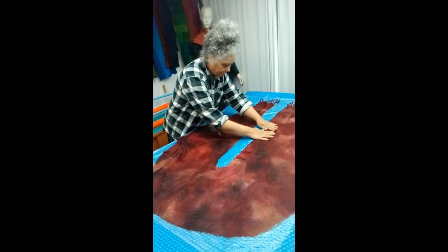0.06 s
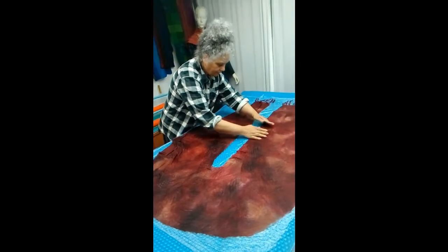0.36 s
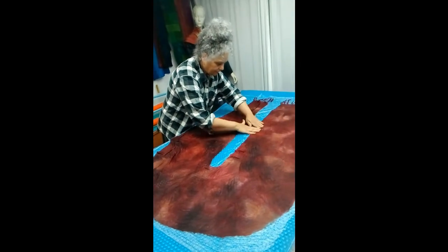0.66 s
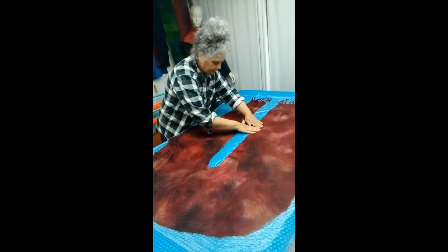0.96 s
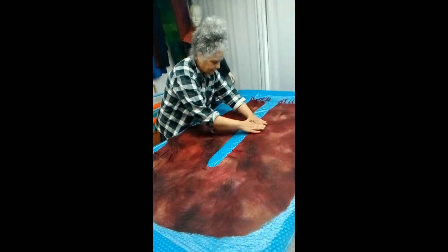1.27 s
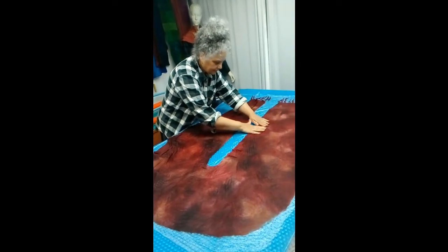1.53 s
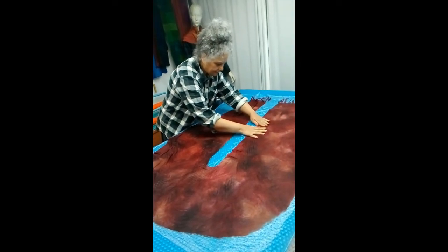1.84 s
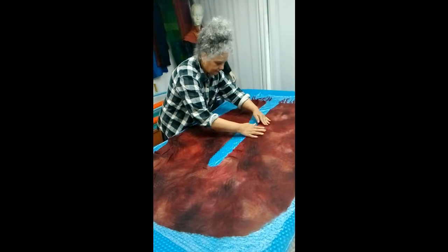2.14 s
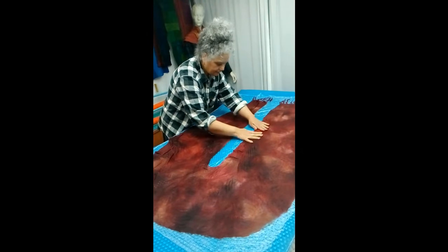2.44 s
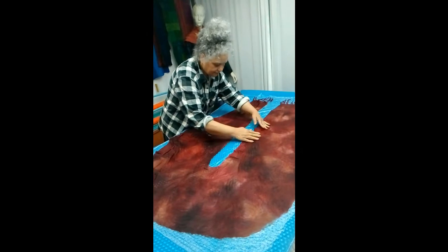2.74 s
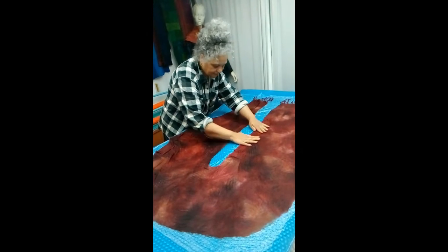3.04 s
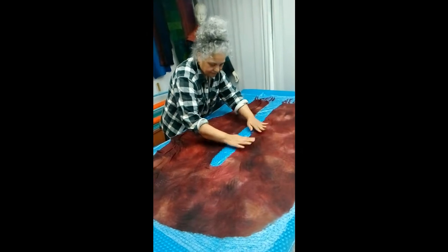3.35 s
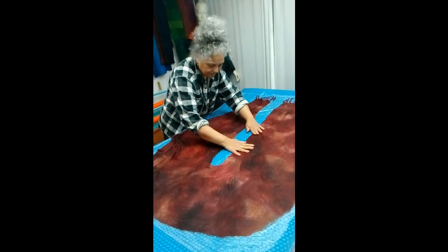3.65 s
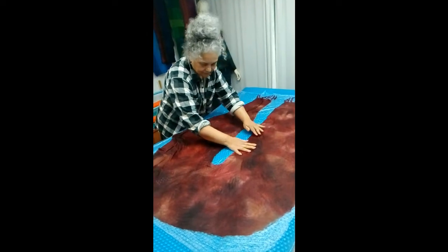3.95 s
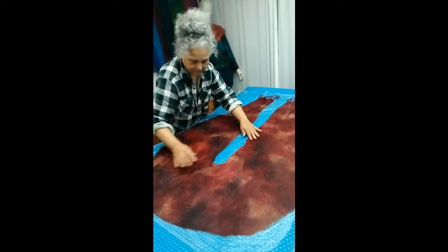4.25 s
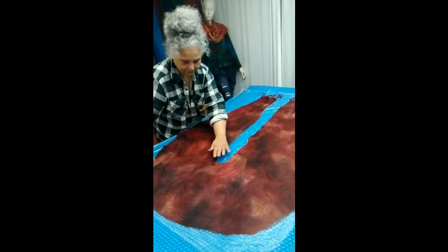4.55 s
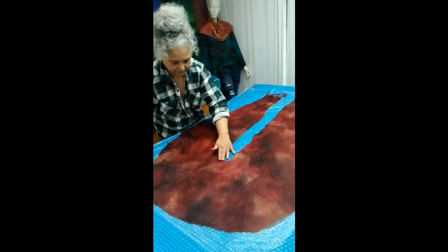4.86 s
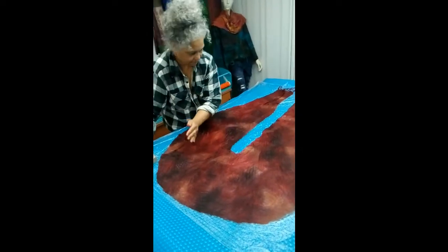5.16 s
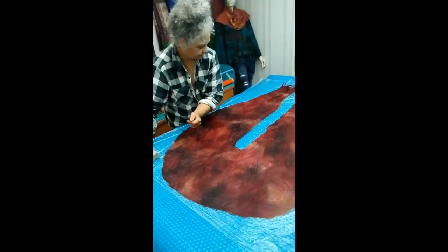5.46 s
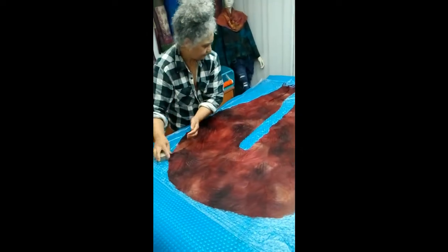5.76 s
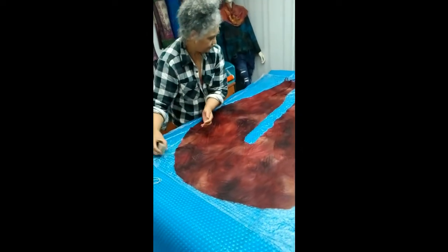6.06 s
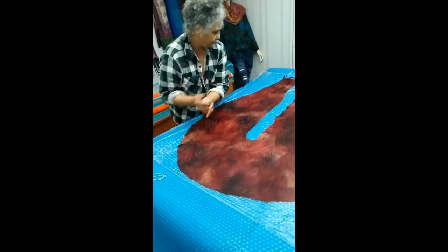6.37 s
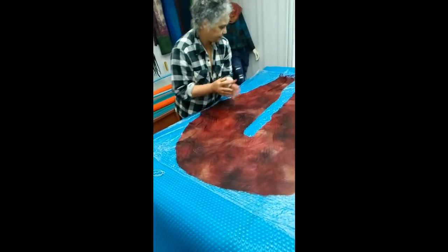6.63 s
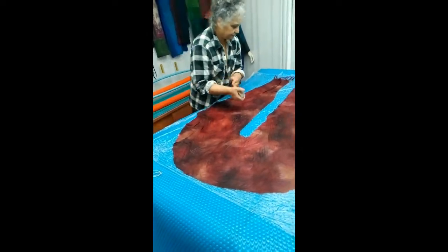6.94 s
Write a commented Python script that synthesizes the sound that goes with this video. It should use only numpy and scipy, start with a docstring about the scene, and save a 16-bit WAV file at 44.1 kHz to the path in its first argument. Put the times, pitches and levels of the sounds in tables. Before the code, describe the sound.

Hands rub wet felt on bubble wrap in soft strokes, then two heavy table thumps and a few small wet pops, over a low hum.

```python
"""Hands rub wet felt laid on bubble wrap, close to the microphone, at a work table in a small room.
The fibres catch and slip with each stroke, and the palms pat the felt softly. Later two heavy thumps
shake the table and crinkle the plastic; a few small wet pops follow as the hands come together.
After a brief low bump at the start, a motor hums some way off, under the steady air of the room."""
import sys
import numpy as np
from scipy import signal
from scipy.fft import rfft, irfft
from scipy.io import wavfile
from scipy.ndimage import uniform_filter1d

SR = 44100
rng = np.random.default_rng(int(sys.argv[2]) if len(sys.argv) > 2 else 0)


def persist_wave(psi):
    """Save psi, clipped to +-1, as 16-bit WAV."""
    counts = np.round(np.clip(psi, -1, 1) * 32767).astype(np.int16)
    wavfile.write(sys.argv[1], SR, np.atleast_2d(counts).T)


N = 308700

# heavy thumps: (time [s], level [dB], gap between rebounds [s], delay of the slap on the plastic [s],
# slap level [dB], spectral hump of the settling plastic [Hz], its fall time constant [s])
HEAVY_THUMPS = [(5.155, -7, .0675, .001, -33.5, 1500, .042), (5.581, -7.5, .045, .0165, -22.5, 2100, .055)]


def rubbing():
    """Wet fibres catch and slip under the palms, with a dull swish and a fizz of water and plastic."""
    # spectra of the fibres and the swish: (frequency [Hz], level [dB])
    felt_spectrum = [(50, -33), (160, 14), (300, 3.5), (600, -2.5), (1000, -2.5), (1400, -2.5), (2050, 4),
                     (2600, -4), (3500, -1), (6000, -27), (9000, -23), (16000, -51)]
    swish_spectrum = [(60, -14), (170, 5), (330, 5), (580, -7.5), (800, 1.5), (1050, 2.5), (1400, -2.5),
                      (2500, -33), (8000, -42), (16000, -50)]
    # spectrum of the fizz, plus a thin, very high hiss near 15 kHz: (frequency [Hz], level [dB])
    fizz_and_hiss = [(500, -24), (2000, -1.5), (3500, -3), (5000, 0), (6600, 0), (7300, -7), (8200, -16),
                     (10500, -18.5), (14000, -22), (14900, -7), (16000, -37)]
    # weight on the palms: (time [s], swish level [dB])
    palm_weight = [(0, -55), (.8, -59), (1.3, -54.5), (2.3, -57), (2.7, -50.5), (3.3, -47.5), (4.4, -56),
                   (4.8, -52.5), (6.4, -73), (7, -66)]
    friction_gain, fizz_gain = strokes()
    swish_db, = curves(palm_weight)
    grip = drift(rate_hz=9.2)  # the palms drag unevenly
    felt = colour(slips(N, per_s=5000, spread_db=3), felt_spectrum)
    felt = shifting(felt, depth_db=2.5, width_hz=220, hold_s=.066)
    fizz = colour(slips(N, per_s=7000, spread_db=-1), fizz_and_hiss)
    fizz = shifting(fizz, depth_db=2, width_hz=300, hold_s=.07)
    swish = colour(rng.standard_normal(N), swish_spectrum)
    swish = shifting(swish, depth_db=2.5, width_hz=130, hold_s=.083)
    beads = near_echoes(colour(slips(N, per_s=70, spread_db=7.5), fizz_and_hiss))  # water beads break
    return (felt * friction_gain * amp(.3 + 1.6 * grip)
            + swish * amp(swish_db + .8 * grip)
            + fizz_gain * (fizz * amp(.4 + .85 * grip) + amp(-10) * beads))


def strokes():
    """Friction and fizz gains: a palm gathers speed, slows a little, then glides to rest."""
    # (start [s], length [s], friction level [dB], fizz level [dB])
    palm_strokes = [(0, .16, -50, -53.5), (.18, .057, -42.5, -45.5), (.285, .2, -49.5, -53),
                    (.595, .255, -46, -46.5), (.87, .2, -44.5, -47), (1.115, .098, -44, -46),
                    (1.35, .12, -45.5, -48.5), (1.51, .25, -48.5, -52.5), (1.82, .057, -46, -47.5),
                    (1.92, .063, -46, -49.5), (2.04, .2, -48, -53), (2.375, .17, -47, -47),
                    (2.68, .17, -47, -50), (2.91, .044, -43, -46.5), (2.985, .095, -44.5, -45.5),
                    (3.115, .27, -45.5, -48), (3.45, .3, -45, -46.5), (3.81, .24, -44.5, -47),
                    (4.075, .31, -46.5, -45.5), (4.63, .2, -43.5, -43.5), (4.82, .2, -48, -45.5),
                    (5.07, .08, -49, -47), (5.265, .125, -44.5, -42), (5.43, .13, -47.5, -43),
                    (5.655, .055, -44, -41), (5.74, .05, -55, -49), (5.825, .22, -46.5, -40.5),
                    (6.105, .085, -45.5, -38.5), (6.54, .05, -53, -56), (6.945, .096, -47, -52)]
    rise_s, sag_db, fall_s = .04, -1.2, .048
    friction_power, fizz_power, t = np.zeros(N), np.zeros(N), np.arange(SR) / SR
    for s, length_s, friction_db, fizz_db in palm_strokes:
        rise = 1 - np.exp(-(t / rise_s) ** 2)
        fall = np.exp(-np.maximum(t - length_s, 0) / fall_s)
        shape = rise * amp(sag_db * np.minimum(t / length_s, 1)) * fall
        add(friction_power, s, (amp(friction_db) * shape) ** 2)
        add(fizz_power, s, (amp(fizz_db) * shape) ** 2)
    return np.sqrt(friction_power), np.sqrt(fizz_power)


def shifting(x, depth_db, width_hz, hold_s):
    """Hands and folds keep changing shape, so patches of the spectrum bloom and fade."""
    hz, when, z = signal.stft(x, SR, nperseg=1024, noverlap=768)
    patches = uniform_filter1d(rng.standard_normal(z.shape), max(1, round(width_hz / hz[1])), axis=0)
    patches = unit(uniform_filter1d(patches, max(1, round(hold_s / when[1])), axis=1))
    return unit(signal.istft(z * amp(depth_db * patches), SR, nperseg=1024, noverlap=768)[1][:N])


def blows():
    """Soft pats land once; each heavy thump rebounds three times, ever weaker, the first a little higher than
    the blow and the next two sinking lower."""
    # a palm on the felt: (time [s], level [dB], pitch [Hz], swell [s])
    pats = [(.589, -25, 163, .006), (.622, -32, 154, .017), (1.402, -26.5, 160, .008),
            (1.86, -32, 160, .013), (2.48, -34.5, 198, .012), (2.79, -33, 205, .013),
            (2.924, -33, 190, .013), (3.515, -25.5, 155, .016), (4.686, -30, 160, .008),
            (4.986, -26, 195, .005), (6.8, -36.5, 168, .009)]
    rebound_db_per_s, pitch_ratio = -172, .54
    out = np.zeros(N)
    for s, db, hz, swell_s in pats:
        add(out, s, amp(db) * thud(hz, swell_s, ring_db=-11))
    for s, db, gap_s, *_ in HEAVY_THUMPS:
        add(out, s, amp(db) * thud(hz=212, swell_s=.005, ring_db=-8.5))
        for k in (1, 2, 3):
            rebound = thud(hz=235 * pitch_ratio ** (k - 1), swell_s=.0065, ring_db=-7)
            add(out, s + k * gap_s, amp(db + rebound_db_per_s * k * gap_s) * rebound)
    return out


def thud(hz, swell_s, ring_db):
    """A padded thud and a brief knock, then the table rings; duller blows barely reach its top modes."""
    # modes of the work table: (frequency [Hz], level [dB], time to fall 60 dB [s])
    table_modes = [(76.7, -9, 0.37), (103.8, -8, 0.28), (143, -5, 0.28), (177.4, 2, 0.22), (239, -3, 0.2),
                   (265.5, -9, 0.25), (319, -11.5, 0.4), (364.2, -1.5, 0.2), (396, -9, 0.33),
                   (449, -8.5, 0.27), (512, -7, .25), (716.6, -6, 0.16)]
    t = np.arange(SR // 2) / SR
    spread = 1 - np.exp(-(t / .014) ** 2)  # the blow takes a moment to travel through the top
    ring = sum(amp(db - 60 * t / t60) * np.sin(2 * np.pi * f * t) / np.hypot(1, (f / (1.8 * hz)) ** 2)
               for f, db, t60 in table_modes)
    knock = amp(-12) * wavelet(t, 1.83 * hz, .55 * swell_s)
    return wavelet(t, hz, swell_s) + knock + amp(ring_db) * spread * ring


def bubble_wrap():
    """The plastic squelches under the hands; each thump touches it, slaps it and leaves it settling."""
    # (time [s], level [dB], rise [s], fall time constant [s], spectral hump [Hz], hump height [dB])
    squelches = [(.587, -39, .003, .015, 3500, 6), (.717, -46, .015, .013, 2310, 22),
                 (2.5875, -31, .0015, .04, 4400, 20), (2.589, -36.5, .0036, .033, 1650, 11),
                 (4.695, -37, .003, .008, 6200, 11), (4.807, -40.5, .004, .014, 5530, 12),
                 (6.446, -34, .004, .019, 6200, 9)]
    out = np.zeros(N)
    for s, *squelch in squelches:
        add(out, s, crinkle(*squelch))
    for s, _, _, delay_s, slap_db, settle_hz, settle_s in HEAVY_THUMPS:
        touch = crinkle(db=-33, rise_s=.0056, fall_s=.016, hump_hz=2100, hump_db=9)
        slap = crinkle(db=slap_db, rise_s=.0011, fall_s=.011, hump_hz=2800, hump_db=6)
        settling = crinkle(db=-28, rise_s=.0065, fall_s=settle_s, hump_hz=settle_hz, hump_db=4)
        add(out, s, touch)
        add(out, s + delay_s, slap)
        add(out, s + delay_s + .006, settling)
    return out


def crinkle(db, rise_s, fall_s, hump_hz, hump_db):
    """Pressed or jolted, the wet plastic lets go a quick shower of clicks."""
    # spectrum of the crinkle, plus a thin, very high hiss near 15 kHz: (frequency [Hz], level [dB])
    crinkle_and_hiss = [(80, -46), (400, 6.5), (800, 1.5), (2000, -1), (3000, -1.5), (4300, -5),
                        (6600, -5.5), (8300, -19), (14000, -28), (15000, -10), (16000, -72)]
    t = np.arange(SR // 3) / SR
    shape = (1 - np.exp(-t / rise_s)) * np.exp(-t / fall_s)
    clicks = colour(slips(len(t), per_s=6000, spread_db=-1), crinkle_and_hiss, hump_hz, hump_db)
    return amp(db) * shape / shape.max() * clicks


def air_pockets():
    """One pocket of air snaps open with a plop and two quick clicks; two more pop, ringing briefly."""
    # clicks of the first pocket: (time [s], level [dB])
    clicks = [(6.4465, -22.5), (6.455, -24)]
    # rings within each click: (frequency [Hz], level [dB], swell [s])
    click_rings = [(467, -3, .0009), (1500, 0, .0014), (3170, -6, .0009), (6300, -2, .00044)]
    # (time [s], level [dB], pitch [Hz])
    small_pops = [(6.7011, -28, 2550), (6.7819, -20.5, 4050)]
    pop_swell_s = .00055
    out, t = np.zeros(N), np.arange(SR // 20) / SR
    click = sum(amp(db) * wavelet(t, hz, swell_s) for hz, db, swell_s in click_rings)
    add(out, 6.4418, amp(-19.5) * plop())
    for s, db in clicks:
        add(out, s, amp(db) * click)
    for s, db, hz in small_pops:
        low_ring = amp(-8) * wavelet(t, .52 * hz, pop_swell_s)
        add(out, s, amp(db) * (wavelet(t, hz, pop_swell_s) + low_ring))
    return out


def plop(start_hz=2650, end_hz=1600, glide_s=.005, swell_s=.0046):
    """A wet, damped ring whose pitch sinks as the pocket of air opens."""
    t = np.arange(SR // 15) / SR
    hz = end_hz + (start_hz - end_hz) * np.exp(-t / glide_s)
    return swell(t / swell_s) * np.sin(2 * np.pi * np.cumsum(hz) / SR)


def hum():
    """A brief low bump, then a motor some way off: a wavering fundamental and its octave."""
    # (time [s], pitch [Hz])
    hum_pitch = [(.6, 66), (1.3, 64.7), (2, 65), (2.6, 68.2), (5, 67.8), (7, 66.2)]
    # a brief low bump at the start, then the hum: (time [s], low tone level [dB], octave level [dB])
    bump_and_hum = [(0, -35, -63), (.2, -58, -44), (1, -50, -41), (1.4, -51, -46.5), (1.9, -45, -46),
                    (2.3, -45, -41), (3.6, -43, -41), (4.5, -44.5, -44), (5.4, -50, -48.5), (7, -51, -50)]
    hz, = curves(hum_pitch)
    low_db, octave_db = curves(bump_and_hum)
    phase = 2 * np.pi * np.cumsum(hz * (1 + .0053 * drift(rate_hz=4.8))) / SR
    low = amp(low_db - .5 + 1.9 * drift(rate_hz=5.1)) * np.sin(phase)
    octave = amp(octave_db + 2.1 * drift(rate_hz=5.1)) * np.sin(2 * phase)
    return np.sqrt(2) * (low + octave)


def near_echoes(x):
    """The table top and close walls scatter a sharp sound for a few hundredths of a second."""
    t = np.arange(SR // 15) / SR
    taps = impulses(len(t), density=.04) * t * np.exp(-t / .0053)
    return signal.fftconvolve(x, taps / np.linalg.norm(taps))[:N]


def room(x, build_s):
    """The small room answers: dense reflections build up, then die band by band."""
    # reverberation: (frequency [Hz], time to fall 60 dB [s])
    decay_times = [(80, 0.44), (250, 0.13), (600, 0.31), (2000, 0.18), (6000, 0.25), (14000, 0.23)]
    t = np.arange(SR // 2) / SR
    taps = impulses(len(t), density=.15) * (1 - np.exp(-(t / build_s) ** 2))
    hz, when, z = signal.stft(taps, SR, nperseg=256)
    decay = amp(-60 * when / at_hz(decay_times, hz)[:, None])
    tail = signal.istft(z * decay, SR, nperseg=256)[1]
    return signal.fftconvolve(x, tail / np.linalg.norm(tail))[:N]


def room_air():
    """Steady room tone at the microphone, mostly low, with a faint hiss."""
    # spectrum of the air, plus a thin, very high hiss near 15 kHz: (frequency [Hz], level [dB])
    air_and_hiss = [(20, -4), (42, -12), (70, -5.5), (110, 3), (200, -4), (330, -8), (620, -13),
                    (1100, -16.5), (2500, -21), (6600, -25), (8200, -39), (13800, -39), (14800, -25.5),
                    (16000, -35)]
    return amp(-43.5) * colour(rng.standard_normal(N), air_and_hiss)


def amp(db):
    return 10 ** (np.asarray(db) / 20)


def unit(x):
    """Scales to rms 1."""
    return x / np.sqrt(np.mean(x ** 2) + 1e-20)


def at_hz(points, hz):
    """Reads a table along straight lines on a log-frequency axis."""
    f, value = np.transpose(points)
    return np.interp(np.log(hz + 1), np.log(f + 1), value)


def curves(rows):
    """Each column of a timed table, at every sample."""
    s, *columns = np.transpose(rows)
    return [np.interp(np.arange(N) / SR, s, c) for c in columns]


def add(mix, s, sound):
    """Mixes a sound in at time s."""
    part = mix[max(round(s * SR), 0):][:len(sound)]
    part += sound[:len(part)]


def colour(x, points, hump_hz=SR, hump_db=0):
    """Gives x a spectrum, with an optional broad hump, at rms 1."""
    hz = np.fft.rfftfreq(len(x), 1 / SR)
    hump = np.exp(-(np.log2((hz + 1) / hump_hz) / 1.06) ** 2)
    return unit(irfft(rfft(x) * amp(at_hz(points, hz) + hump_db * hump), len(x)))


def drift(rate_hz):
    """Slow random wander of rms 1."""
    hz = np.fft.rfftfreq(N, 1 / SR)
    return unit(irfft(rfft(rng.standard_normal(N)) / (1 + (hz / rate_hz) ** 4), N))


def impulses(size, density):
    """Spikes of random sign; density is the chance of one at each sample."""
    return rng.choice([-1., 1.], size) * (rng.random(size) < density)


def slips(size, per_s, spread_db):
    """Tiny clicks of uneven strength at random times, at rms 1."""
    strength = amp(spread_db * np.minimum(rng.exponential(1, size), 4))
    return unit(strength * impulses(size, per_s / SR))


def swell(u):
    """An envelope that reaches height 1 at u = 1 and dies quickly."""
    return (u * np.exp(1 - u)) ** 2


def wavelet(t, hz, swell_s):
    """A heavily damped ring that swells and dies within a few cycles."""
    return swell(t / swell_s) * np.sin(2 * np.pi * hz * t)


def scene():
    """One microphone near the hands, air and hum behind; blows, crinkles and pops stir the room."""
    air = room_air()
    thuds, plastic, pops = blows(), bubble_wrap(), air_pockets()
    close = thuds + plastic + pops + amp(-4.5) * near_echoes(pops)
    far = room(amp(-10) * (thuds + plastic) + amp(-6.5) * pops, build_s=.011)
    return (air + hum() + rubbing() + close + far)[None]


def record(dry):
    """The recorder cuts off the highest treble."""
    edge_hz = 15700
    lowpass = signal.firwin(511, edge_hz, window=("kaiser", 9), fs=SR)
    return signal.oaconvolve(dry, lowpass[None], "same")


dry = scene()
out = record(dry)
persist_wave(out)
```